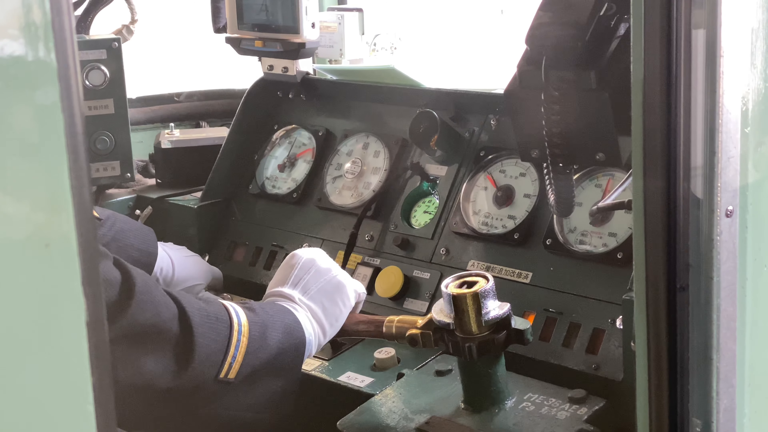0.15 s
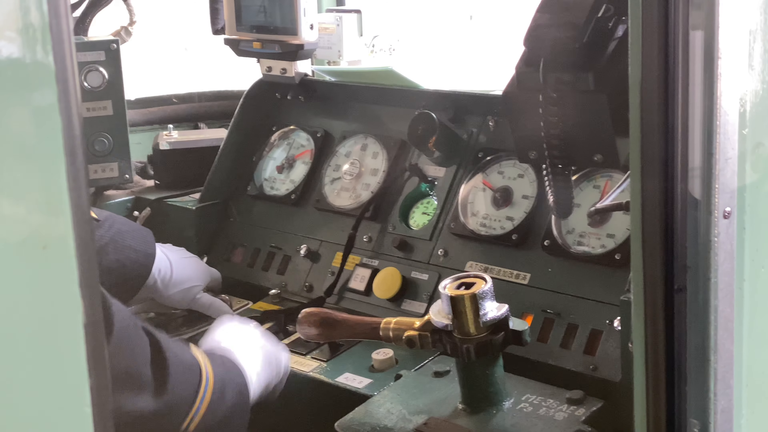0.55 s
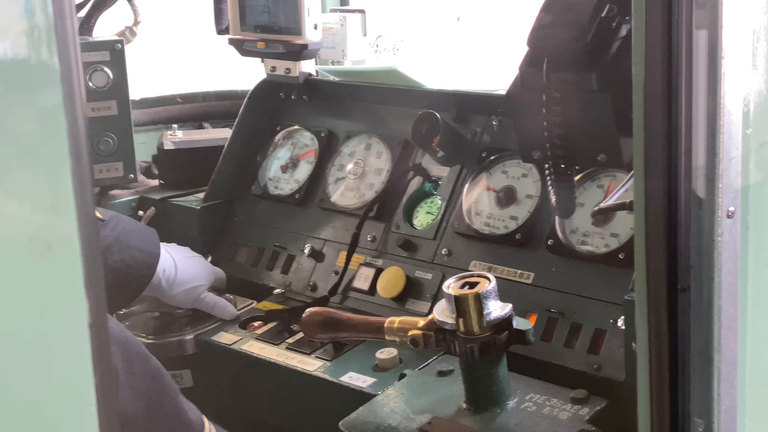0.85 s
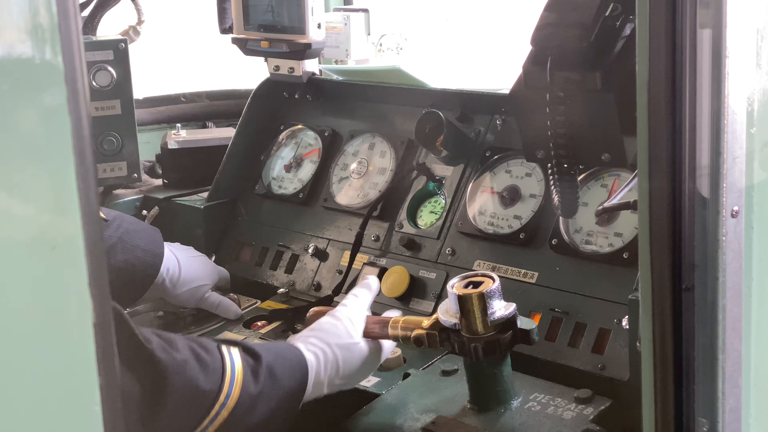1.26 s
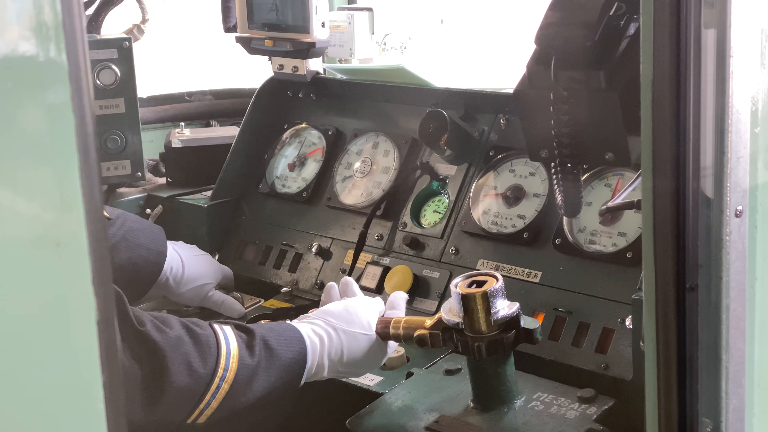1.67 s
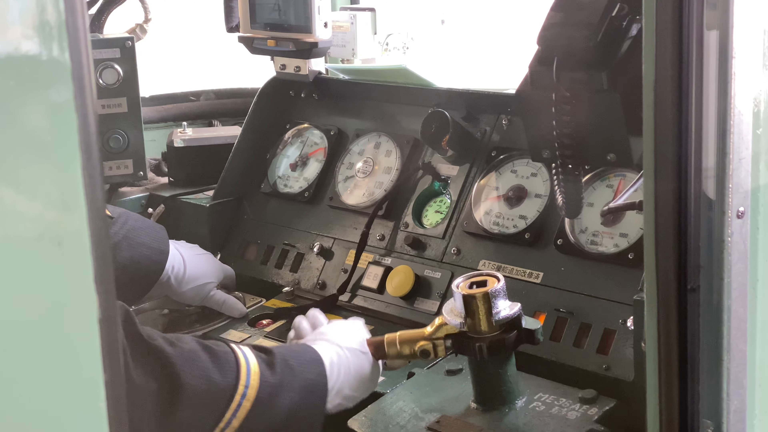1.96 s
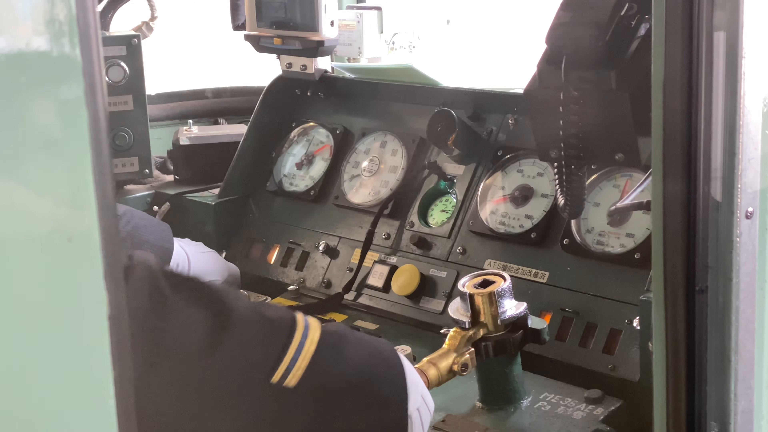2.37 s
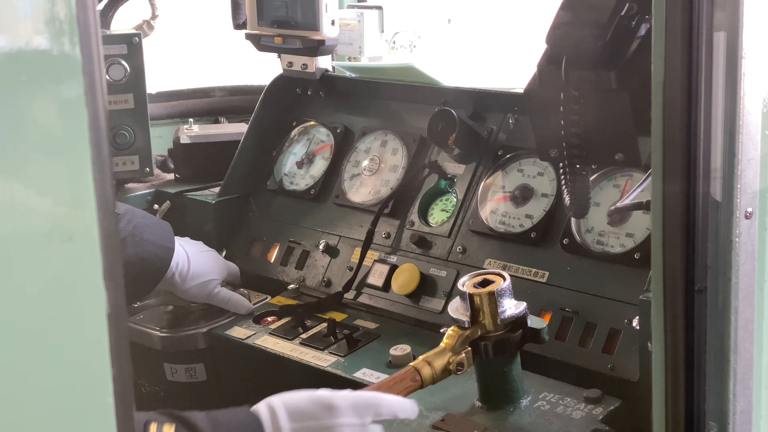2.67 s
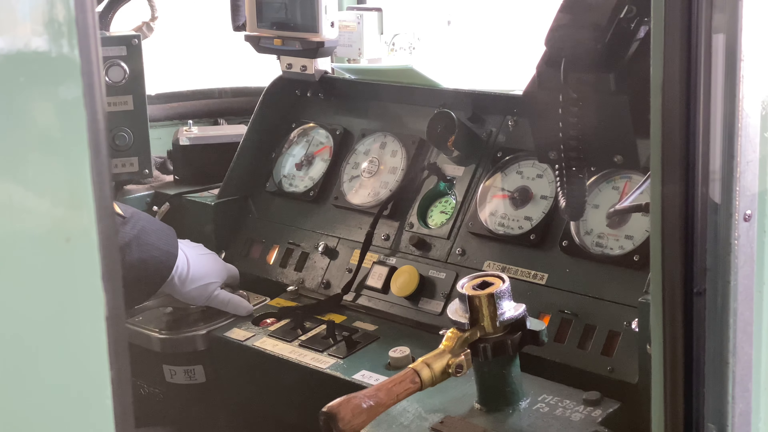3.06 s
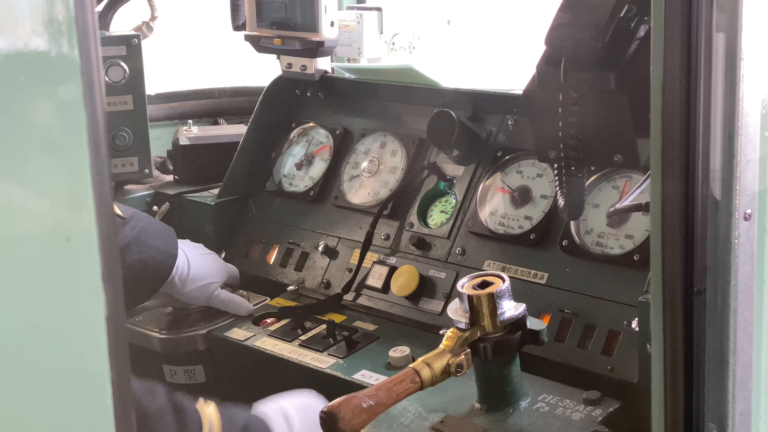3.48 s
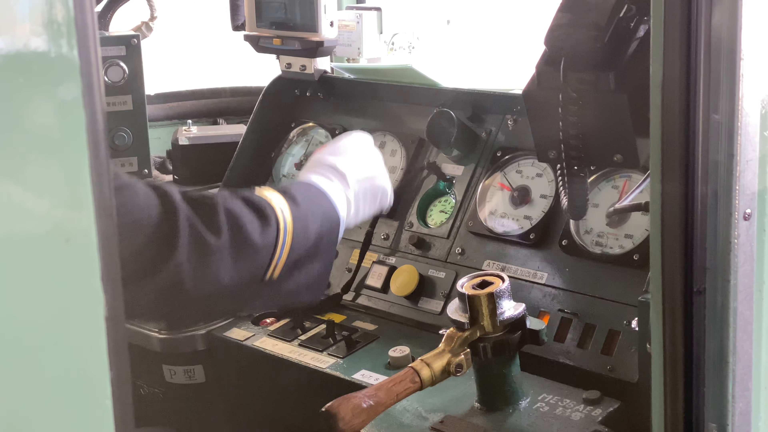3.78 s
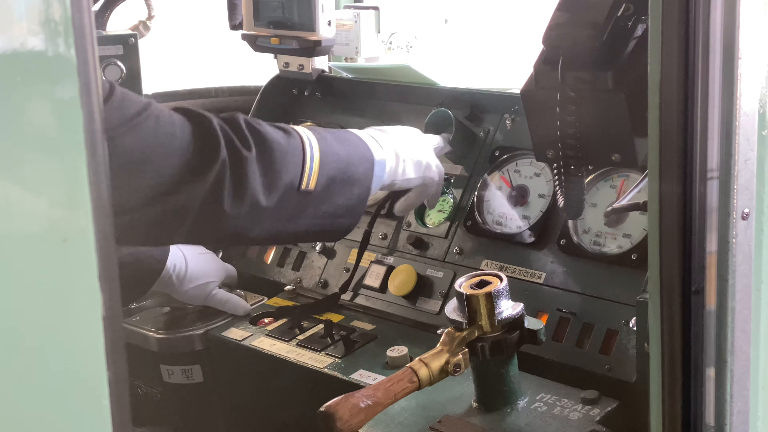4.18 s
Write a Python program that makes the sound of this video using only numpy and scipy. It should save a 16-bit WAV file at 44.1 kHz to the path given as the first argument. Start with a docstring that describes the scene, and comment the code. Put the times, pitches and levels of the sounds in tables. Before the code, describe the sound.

Quiet train cab with low rumble, a few clicks and dull knocks, then a thump and a loud steady hiss of compressed air.

```python
"""A low rumble, a draught buffeting the microphone and a thin seep of air: the cab of an electric train.
The driver swings the brass handle over its notches, with clicks and grainy scrapes, amid low uneven shudders.
At the last notch the exhaust port opens with a thump, and air hisses out steadily through ringing pipework.
Air, rumble and shudders are shaped noise; knocks and thuds are gliding tones; noise clicks ring the brass."""
import sys
import numpy as np
from scipy import signal
from scipy.fft import rfft, irfft, next_fast_len
from scipy.io import wavfile
from scipy.ndimage import uniform_filter1d, map_coordinates

SR = 44100
rng = np.random.default_rng(int(sys.argv[2]) if len(sys.argv) > 2 else 0)


def dump(signal):
    """Clip the signal to [-1, 1] and save it as 16-bit WAV at the path in sys.argv[1]."""
    limited = np.clip(np.atleast_2d(signal).T, -1, 1)
    pcm = np.round(limited * 32767).astype(np.int16)
    wavfile.write(sys.argv[1], SR, pcm)


N = 195495  # length in samples

# Spectrum of the exhaust jet. Each row: frequency in Hz, relative density in dB.
JET_SPECTRUM = [(2400, -9.5), (3100, 0), (3500, 0), (3800, -0.5), (4200, 0.5), (4700, -3.5), (5150, -3),
                (5700, 2.5), (6400, -2), (7200, -1.5), (8100, -6.5), (10500, -8.5), (13000, -15),
                (16000, -10.5)]
# Spectrum of the exhaust throat. Each row: frequency in Hz, relative density in dB.
THROAT_SPECTRUM = [(700, -29), (1300, -15), (1600, -19.5), (1850, -9.5), (2130, -2.5), (2400, 2),
                   (2700, -0.5), (3000, -25), (3600, -26)]
# Narrow resonances of the pipework. Each row: frequency in Hz, relative level in dB.
PIPE_RESONANCES = [(2110, -48), (2308, -41.5), (2455, -47), (2630, -59), (2857, -46), (2170, -55),
                   (3484, -48), (4220, -52.5), (4258, -50), (4730, -48), (5430, -49.5), (2786, -53),
                   (6990, -51.5), (7219, -46.5)]
# Side filter of the hiss, uneven over frequency. Each row: frequency in Hz, side minus mid in dB.
HISS_SIDE = [(1200, 0.5), (2000, -69), (3000, -9.5), (4500, -18), (7200, -45), (8600, 8.5), (11000, -15),
             (13000, 10.5), (16000, 1)]
JET_OPEN_S, JET_RISE_S, JET_DB, JET_SURGE_DB = 3.066, 0.064, -32.5, 5.5  # level once settled
PIPE_OPEN_S, PIPE_RISE_S = 3.05, 0.07  # throat and ring open together
THROAT_DB, THROAT_SURGE_DB, RING_DB, RING_SURGE_DB = -34.5, 1.9, -37, 2
CRACK_S, CRACK_RISE_S, CRACK_DB = 2.975, 0.044, -32  # the trickle before the port opens wide
SETTLE_S = 0.37  # time scale on which the surge dies

# Short low and mid-pitched blows. Each row: start in seconds, pitch in Hz, peak in dB,
# rise in seconds, t60 in seconds, starting pitch offset in octaves.
THUDS = [(0.125, 1417, -48.5, 0.022, 0.095, -0.036), (2.034, 770, -49.5, .006, 0.085, 0.046),
         (2.03, 256.6, -30.5, 0.018, 0.049, -0.16), (2.205, 454, -37, 0.018, 0.087, 0.0085),
         (3.002, 660, -35.5, 0.0066, .06, .1), (3.027, 322, -27.5, 0.016, 0.063, 0.069),
         (3.064, 301, -26.5, 0.02, 0.045, 0.19), (3.086, 170, -12, 0.0306, 0.016, -.9)]
# Decay of the cab's walls. Each row: frequency in Hz, t60 in seconds.
CAB_DECAY = [(100, 0.39), (1000, 0.43), (4000, 0.15), (12000, 0.041)]

# The handle on its notches. Each row: start in seconds, relative scrape level in dB, peak of the ring in dB.
NOTCHES = [(0.0, -35, -48), (0.045, -41, -60), (0.129, -40, -52), (1.342, -56, -41.5), (2.03, -45.5, -54),
           (2.225, -47, -47), (2.983, -42, -60), (3.005, -47, -50), (3.033, -33, -39)]
# Modes of the brass handle. Each row: frequency in Hz, relative level in dB, t60 in seconds.
BRASS_MODES = [(3050, -5, 0.042), (3240, -1, 0.048), (3910, -1, 0.043), (4470, 1.5, .03), (5560, -7, 0.042)]
# Filter that colours the scrape. Each row: frequency in Hz, gain in dB.
SCRAPE_SPECTRUM = [(300, 7.5), (900, 5), (2200, -5), (4500, -12.5), (7000, -9), (12000, -22)]
CLICK_T60_S, SCRAPE_T60_S = 0.037, .1  # a notch rings with a short click and scrapes on for longer

# Valve ports that the handle uncovers in passing. Each row: start in seconds, open time in seconds,
# leak in dB and fizz in dB before they sag.
PORTS = [(-.11, 0.13, -55, -67.5), (0.08, 2.17, -57, -62.5), (1.88, 0.39, -58.5, -71),
         (2.6, .16, -58.5, -69), (2.79, 0.095, -64.5, -91)]
# Spectrum of the leak. Each row: frequency in Hz, relative density in dB.
LEAK_SPECTRUM = [(900, -1), (1600, -4), (2300, 1.5), (3000, -1.5), (4000, 2), (4900, -2.5), (5600, 0.5),
                 (6400, 0), (7400, 0), (8300, -10.5), (10000, -15)]
# Spectrum of the finer fizz above it. Each row: frequency in Hz, relative density in dB.
FIZZ_SPECTRUM = [(6500, -4.5), (8300, -3.5), (11500, 0), (13000, -13), (16000, -14)]
PORT_OPEN_S, PORT_SAG_DB_PER_S, PORT_CLOSE_DB_PER_S = 0.12, 6, 85
SHUT_LEAK_DB, SHUT_FIZZ_DB = -68.5, -82  # what seeps past with every port shut

# Gusts of air. Each row: start in seconds, length in seconds, flutter in dB and low buffet in dB
# before they flicker.
GUSTS = [(-.035, 0.037, -46.5, -41), (0.08, 0.073, -51, -50), (2.985, 0.17, -43.5, -54),
         (3.17, 0.26, -46, -33), (3.31, 0.045, -33, -37), (3.6, 0.022, -51, -42), (3.75, 0.026, -55, -47),
         (3.79, 0.073, -62, -31), (3.87, 0.76, -58, -29.5), (3.965, 0.063, -35, -36),
         (4.05, 0.15, -40.5, -37), (4.2, 0.12, -34, -35)]
# Spectrum of the flutter. Each row: frequency in Hz, relative density in dB.
FLUTTER_SPECTRUM = [(300, -3.5), (420, 2.5), (480, -7.5), (540, 7.5), (590, 0.5), (650, 3.5), (760, -2.5),
                    (880, 1.5), (1080, -11), (1400, -4.5), (1700, -14), (4000, -16.5)]
# Spectrum of air buffeting the microphone. Each row: frequency in Hz, relative density in dB.
BUFFET_SPECTRUM = [(70, -16), (110, 6.5), (150, 3), (195, 0.5), (215, -8), (250, -22.5)]
GUST_RISE_S, GUST_FALL_DB_PER_S = 0.025, 156
FLUTTER_REST_DB, BUFFET_REST_DB = -48.5, -40  # floor under the gusts once the jet is open

# Dull knocks of the cab. Each row: time in seconds, level in dB before the knock's quick decay.
KNOCKS = [(0.143, -29.5), (0.305, -33), (0.464, -33), (0.584, -30), (0.623, -40), (0.737, -29),
          (1.226, -38.5), (2.044, -54), (2.203, -30)]

# Low, uneven rubs and shudders, as of handling or wind at the microphone. Each row: start in seconds,
# length in seconds, rub in dB and hollow boom in dB before they waver.
SHUDDERS = [(-.03, 0.092, -41.5, -44.5), (.07, 0.15, -49, -42), (.31, 0.1, -51, -41), (.57, 0.23, -47, -45),
            (.83, 0.023, -40.5, -47.5), (.94, 0.035, -49.5, -47), (1.21, 0.021, -45.5, -59),
            (1.35, 0.063, -47, -41), (2.025, 0.085, -40, -43), (2.18, 0.11, -42, -39.5),
            (2.34, 0.034, -41, -39), (2.67, 0.027, -48, -66), (3.01, 0.11, -36.5, -37.5),
            (3.3, 0.12, -39.5, -43), (3.61, 0.032, -36, -45), (3.73, 0.29, -41, -41.5),
            (4.03, .33, -36, -30.5)]
# Spectrum of the low rub. Each row: frequency in Hz, relative density in dB.
LOW_RUB_SPECTRUM = [(180, -6.5), (235, 3.5), (300, 0), (350, -3.5), (430, -12), (520, -25.5)]
# Spectrum of the higher rub. Each row: frequency in Hz, relative density in dB.
HIGH_RUB_SPECTRUM = [(330, -26), (450, 3), (560, -1.5), (800, -4.5), (1100, -11), (1500, -17.5),
                     (2500, -18.5)]
# Spectrum of the hollow boom. Each row: frequency in Hz, relative density in dB.
BOOM_SPECTRUM = [(100, -14.5), (140, -1.5), (205, -1.5), (240, -19)]
# Stereo width of the boom. Each row: frequency in Hz, side minus mid in dB.
BOOM_WIDTH = [(100, 9), (240, 0.5)]
SHUDDER_RISE_S, SHUDDER_FALL_DB_PER_S = 0.029, 130
LOW_RUB_REST_DB, HIGH_RUB_REST_DB = -54, -61  # murmur between shudders
HIGH_RUB_SHARE_DB = -15.5  # the higher rub's level relative to the low one in a shudder

# Strength of the draught and rumble. Each row: time in seconds, level in dB.
DRAUGHT = [(0.0, -31), (0.47, -30.5), (0.49, -37.5), (0.69, -21), (0.74, -33.5), (0.84, -25.5),
           (0.88, -32.5), (1.91, -43), (2.58, -32.5), (2.64, -41.5), (3.01, -39), (3.05, -65), (3.12, -27),
           (3.18, -57), (3.31, -29), (3.53, -45), (3.65, -31.5), (3.7, -50), (3.75, -25), (4.43, -30)]
# Spectrum of the car's rumble. Each row: frequency in Hz, relative density in dB.
RUMBLE_SPECTRUM = [(15, -46), (25, -15), (33, -24.5), (43, -4.5), (56, 2.5), (72, -4), (100, -8.5),
                   (140, -28.5)]
# Stereo width of the low sounds. Each row: frequency in Hz, side minus mid in dB.
LOW_WIDTH = [(25, 25), (40, 18), (60, 2), (110, 5), (190, -3.5), (260, -9), (400, -9), (700, -7.5),
             (1200, 3), (2000, -16)]
BUFFET_DB, BUFFET_GROWS = -44, 0.36  # level at the draught's mean strength; dB per dB of draught

TOP_HZ = 15850  # upper band limit


def exhaust():
    """The port cracks and opens wide: throat and ringing pipework lead, the jet follows, then all settle."""
    jet = rush(lambda hz: shape(JET_SPECTRUM, hz) * echoes(hz, ripple_db=3.0, spacing_hz=44.17), HISS_SIDE)
    throat = rush(lambda hz: shape(THROAT_SPECTRUM, hz) * echoes(hz, ripple_db=5.0, spacing_hz=21.9), HISS_SIDE)
    ring = rush(lambda hz: pipework(hz, width_hz=20), HISS_SIDE)
    jet = amp(JET_DB) * flow(JET_OPEN_S, JET_RISE_S, JET_SURGE_DB) * jet
    throat = amp(THROAT_DB) * flow(PIPE_OPEN_S, PIPE_RISE_S, THROAT_SURGE_DB) * throat
    ring = amp(RING_DB) * flow(PIPE_OPEN_S, PIPE_RISE_S, RING_SURGE_DB) * ring
    flicker = amp(0.35 * wobble(35))
    return flicker * (jet + throat + ring)


def pipework(hz, width_hz):
    """Response of narrow pipe resonances, each with its own strength."""
    power = sum(amp(db) ** 2 / (1 + (2 * (hz - f) / width_hz) ** 2) ** 2 for f, db in PIPE_RESONANCES)
    return np.sqrt(power)


def flow(open_s, rise_s, surge_db):
    """Gain of the exhaust: a trickle once the port cracks, then a surge that settles."""
    since = np.maximum(np.arange(N) / SR - open_s, 0)
    opening_db = CRACK_DB * (1 - rise(open_s, rise_s))
    settling_db = surge_db * np.exp(-(since / SETTLE_S) ** 2)
    return rise(CRACK_S, CRACK_RISE_S) * amp(opening_db + settling_db)


def thuds():
    """Short low and mid-pitched blows: each swells, slides to its wavering pitch and dies."""
    out, t = np.zeros(N), np.arange(SR // 3) / SR
    for s, hz, db, rise_s, t60, glide in THUDS:
        octaves = glide * np.exp(-t / 0.0212) + 0.089 * wobble(120)[:len(t)]
        pitch = hz * 2 ** octaves
        swell = np.minimum(t / rise_s, 1) ** 1.4
        decay = amp(db - 60 * np.maximum(t - rise_s, 0) / t60)
        add(out, s, swell * decay * np.sin(2 * np.pi * np.cumsum(pitch) / SR))
    return in_cab(out, wet_db=-10.5)


def handle():
    """The handle clicks into each notch, which rings its brass, and scrapes grainily over it."""
    rings, scrapes, t = np.zeros(N), np.zeros(N), np.arange(SR // 4) / SR
    brass = sum(amp(level - 60 * t / t60) * np.sin(2 * np.pi * hz * t) for hz, level, t60 in BRASS_MODES)
    for s, scrape_db, ring_db in NOTCHES:
        grains = rng.standard_normal(len(t)) * amp(2.6 * wobble(240)[:len(t)])
        stroke = grains * (1 - np.exp(-t / 0.002)) * amp(-60 * t / SCRAPE_T60_S)
        click = grains * amp(-60 * t / CLICK_T60_S)
        ring = signal.fftconvolve(click, brass)[:len(t)]
        add(rings, s, amp(ring_db) * ring / np.abs(ring).max())
        add(scrapes, s, amp(scrape_db + 1.0) * stroke)
    scrapes = filtered(scrapes, lambda hz: shape(SCRAPE_SPECTRUM, hz))
    return in_cab(rings + scrapes, wet_db=-8)


def seep():
    """A thin leak swells at each port that the handle uncovers, and sags as the pressure behind it drops."""
    leak_power, fizz_power = swells(PORTS, PORT_OPEN_S, PORT_CLOSE_DB_PER_S, PORT_SAG_DB_PER_S)
    leak = rush(lambda hz: shape(LEAK_SPECTRUM, hz) * echoes(hz, ripple_db=1.8, spacing_hz=200), HISS_SIDE)
    fizz = band(FIZZ_SPECTRUM, HISS_SIDE)
    leak_gain = np.sqrt(leak_power + amp(SHUT_LEAK_DB) ** 2)
    fizz_gain = np.sqrt(fizz_power + amp(SHUT_FIZZ_DB) ** 2)
    return leak_gain * leak + fizz_gain * fizz


def gusts():
    """Gusts flutter in the cab and buffet the microphone; once the jet opens, both also keep a steady floor."""
    flutter_power, buffet_power = swells(GUSTS, GUST_RISE_S, GUST_FALL_DB_PER_S)
    opened = rise(JET_OPEN_S, JET_RISE_S)
    flutter_gain = np.sqrt(flutter_power + opened * amp(FLUTTER_REST_DB) ** 2)
    buffet_gain = np.sqrt(buffet_power + opened * amp(BUFFET_REST_DB) ** 2)
    flutter = flutter_gain * band(FLUTTER_SPECTRUM, LOW_WIDTH, steady=0.43)
    buffet = buffet_gain * band(BUFFET_SPECTRUM, LOW_WIDTH, steady=1.0)
    return amp(1.0 * wobble(140) + 0.7 * wobble(30)) * flutter + amp(0.44 * wobble(55)) * buffet


def knocks():
    """Short dull knocks: a panel gives for a few cycles, falling in pitch."""
    out, t = np.zeros(N), np.arange(SR // 10) / SR
    for (s, db), pitch in zip(KNOCKS, rng.standard_normal(len(KNOCKS))):
        hz = 300 * np.exp(.08 * pitch) * (1 + 1.43 * np.exp(-t / 0.0029))
        contact = 1 - np.exp(-(t / 0.0014) ** 2)
        decay = amp(db - 60 * t / 0.029)
        add(out, s - .001, decay * contact * np.sin(2 * np.pi * np.cumsum(hz) / SR))
    return in_cab(out, wet_db=-11.0)


def shudders():
    """Low, uneven rubs and booms, as of handling or wind at the microphone; the rubs murmur on between."""
    power, boom_power = swells(SHUDDERS, SHUDDER_RISE_S, SHUDDER_FALL_DB_PER_S)
    unevenness = amp(1.06 * wobble(70))
    low_gain = np.sqrt(power + amp(LOW_RUB_REST_DB) ** 2)
    high_gain = np.sqrt(power * amp(HIGH_RUB_SHARE_DB) ** 2 + amp(HIGH_RUB_REST_DB) ** 2)
    low_rub = low_gain * band(LOW_RUB_SPECTRUM, LOW_WIDTH, steady=1)
    high_rub = high_gain * band(HIGH_RUB_SPECTRUM, LOW_WIDTH, steady=1)
    boom = np.sqrt(boom_power) * band(BOOM_SPECTRUM, BOOM_WIDTH, steady=0.58)
    return unevenness * (low_rub + high_rub + boom)


def draught():
    """Car rumble, and eddies that buffet the two microphone ports unequally; one strength drives both."""
    strength_db, = curves(DRAUGHT)
    rumble = amp(strength_db) * band(RUMBLE_SPECTRUM, LOW_WIDTH, steady=0.44)
    rumble = rumble * amp([[-.9], [.9]])  # a little stronger on the right
    buffet_db = BUFFET_DB + BUFFET_GROWS * (strength_db - strength_db.mean())
    eddies = unit(amp(1.6 * wobble(55)) * band(BUFFET_SPECTRUM, LOW_WIDTH, steady=0.31))
    return rumble + amp(buffet_db) * eddies


def in_cab(x, wet_db):
    """A sound plus the short answer of the cab's walls: noise whose decay depends on frequency."""
    hz, t, z = signal.stft(rng.standard_normal((2, SR // 3)), SR, nperseg=256)
    decay = amp(-60 * t / along(CAB_DECAY, hz)[:, None])
    tail = signal.istft(z * decay, SR, nperseg=256)[1]
    tail = tail / np.linalg.norm(tail[0])
    return x + amp(wet_db) * signal.fftconvolve(x[None], tail, axes=1)[:, :N]


def echoes(hz, ripple_db, spacing_hz):
    """Close walls comb a sound into fixed fine peaks and dips, drawn at random over frequency."""
    knots = rng.standard_normal(SR // 8)
    return amp(ripple_db * np.tanh(map_coordinates(knots, [hz / spacing_hz], mode="mirror")))


def rise(start_s, rise_s):
    """A smooth step from 0 to 1."""
    return np.sin(np.pi / 2 * np.clip((np.arange(N) / SR - start_s) / rise_s, 0, 1)) ** 2


def swells(rows, rise_s, fall_db_per_s, sag_db_per_s=0):
    """Rows (s, length s, dB, ..) rise, hold with a sag and fall; one summed power curve per dB column."""
    power = 0
    for s, length, *levels in rows:
        t = np.arange(N) / SR - s
        sag_db = sag_db_per_s * np.clip(t, 0, length)
        fall_db = fall_db_per_s * np.maximum(t - length, 0)
        envelope = rise(s, rise_s) * amp(-sag_db - fall_db)
        power = power + np.outer(amp(levels), envelope) ** 2
    return power


def rush(colour, width, steady=0):
    """Stereo noise with a mid of rms 1; steady (0-1) evens out its slow swells."""
    pair = filtered(rng.standard_normal((2, N)), colour)
    swell = np.sqrt(np.abs(uniform_filter1d(pair ** 2, size=SR // 10, axis=1)) + 1e-20)
    mid, side = unit(pair / swell ** min(steady, 1))
    side = filtered(side, lambda hz: amp(along(width, hz)))
    return np.array([mid + side, mid - side])


def band(points, width, steady=0):
    """Stereo noise with the given spectrum."""
    return rush(lambda hz: shape(points, hz), width, steady)


def shape(points, hz):
    """Gain of a spectrum that falls 24 dB per octave beyond its ends."""
    below = np.maximum(np.log2(points[0][0] / (hz + 1)), 0)
    above = np.maximum(np.log2((hz + 1) / points[-1][0]), 0)
    return amp(along(points, hz) - 24 * (below + above))


def along(points, hz):
    """Read (Hz, value) points on a log axis."""
    f, v = np.transpose(points)
    return np.interp(np.log(hz + 1), np.log(f + 1), v)


def curves(rows):
    """One value per sample for each column after the time."""
    s, *cols = np.transpose(rows)
    return [np.interp(np.arange(N) / SR, s, c) for c in cols]


def wobble(rate):
    """A smooth random curve, rate knots a second."""
    return map_coordinates(rng.standard_normal(int(N * rate / SR) + 4), [np.arange(N) * rate / SR])


def filtered(x, response):
    """Filter x by a response of frequency."""
    m = next_fast_len(N + SR // 2)
    return irfft(rfft(x, m) * response(np.fft.rfftfreq(m, 1 / SR)), m)[..., :N]


def add(track, s, sound):
    """Mix a sound into a track at time s."""
    part = track[..., round(s * SR):][..., :sound.shape[-1]]
    part += sound[..., :part.shape[-1]]


def amp(db):
    """Decibels to gain."""
    return 10 ** (np.asarray(db) / 20)


def unit(x):
    """Scale to rms 1."""
    return x / np.sqrt(np.mean(x ** 2) + 1e-20)


def scene():
    """Everything heard in the cab, from the exhaust back to the draught."""
    return exhaust() + thuds() + handle() + seep() + gusts() + knocks() + shudders() + draught()


def record(dry):
    """The microphone channel keeps nothing above its band limit."""
    return filtered(dry, lambda hz: hz < TOP_HZ)


dry = scene()
out = record(dry)
dump(out)
```